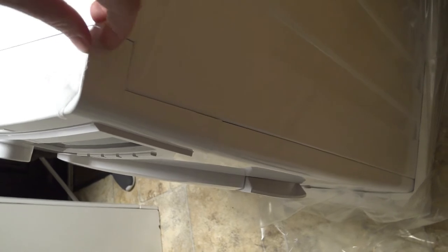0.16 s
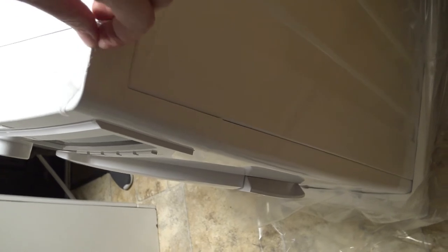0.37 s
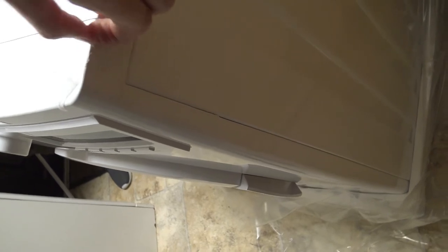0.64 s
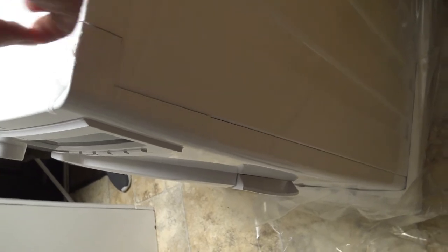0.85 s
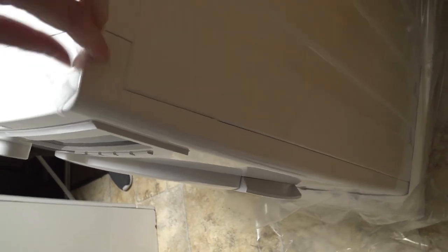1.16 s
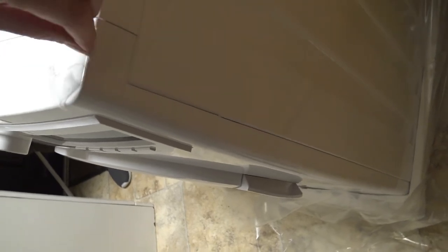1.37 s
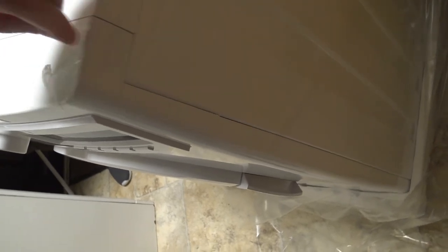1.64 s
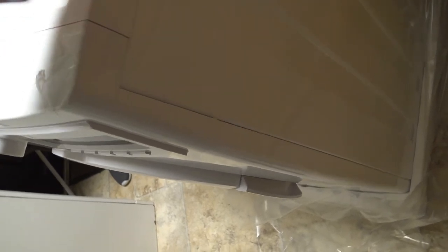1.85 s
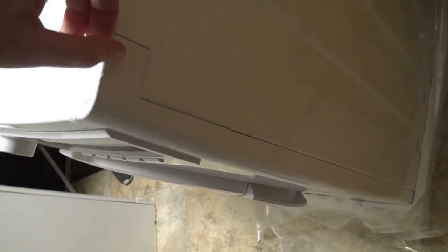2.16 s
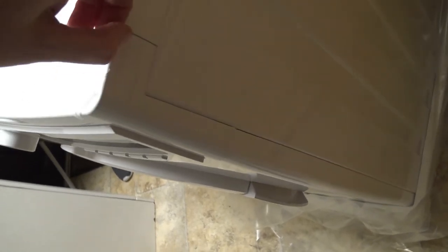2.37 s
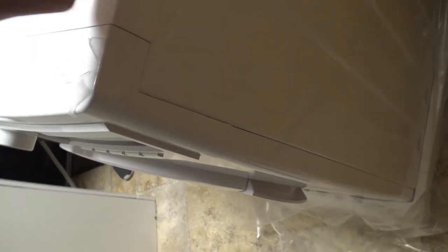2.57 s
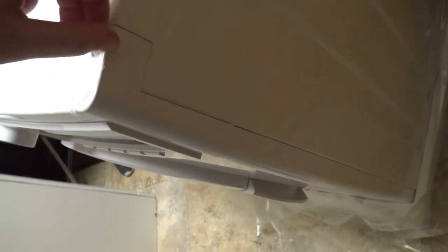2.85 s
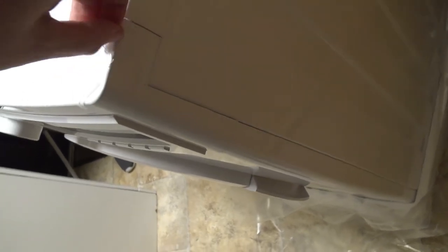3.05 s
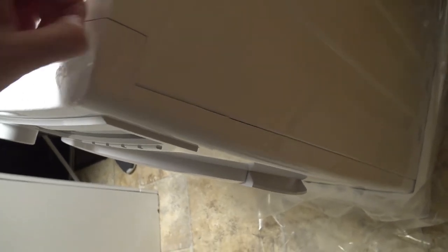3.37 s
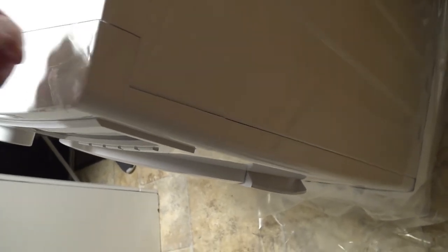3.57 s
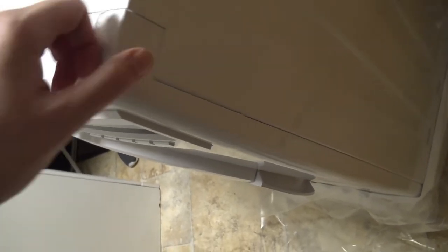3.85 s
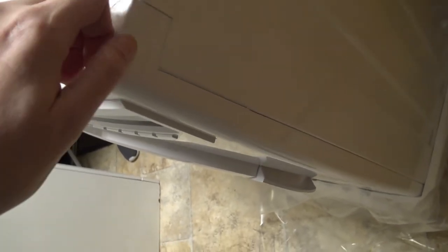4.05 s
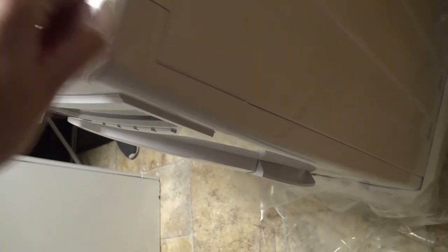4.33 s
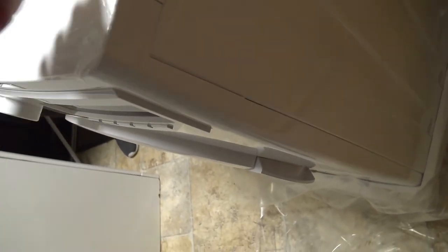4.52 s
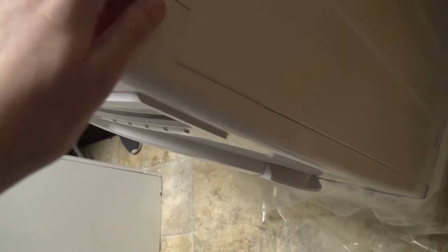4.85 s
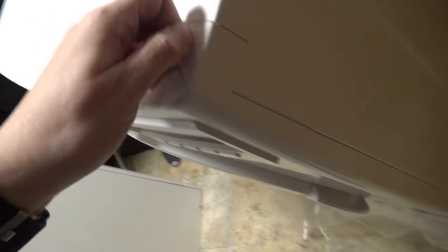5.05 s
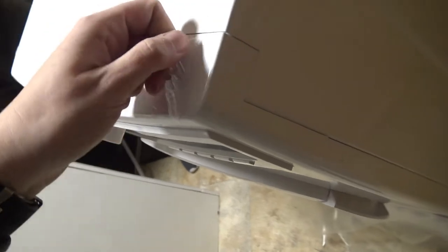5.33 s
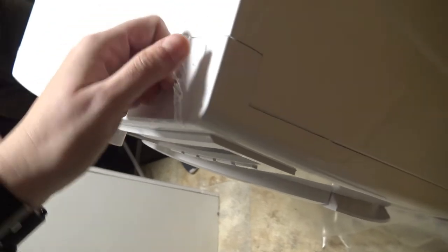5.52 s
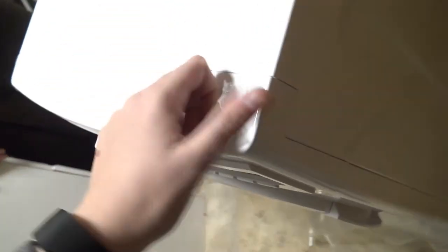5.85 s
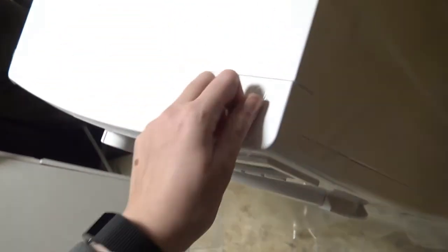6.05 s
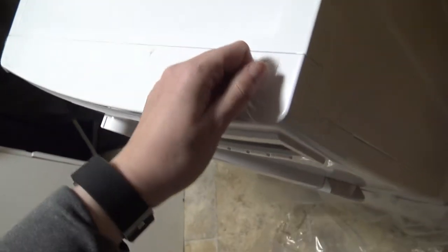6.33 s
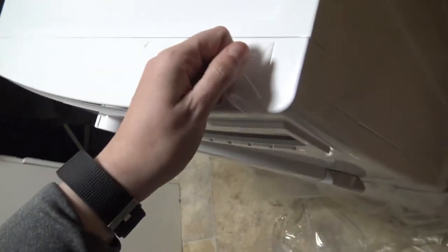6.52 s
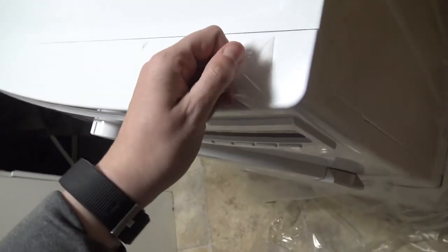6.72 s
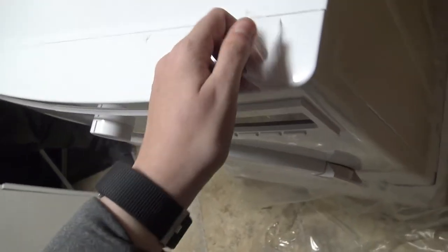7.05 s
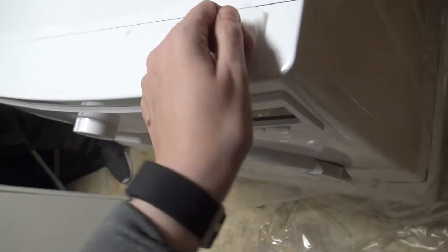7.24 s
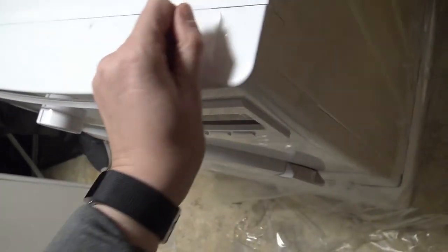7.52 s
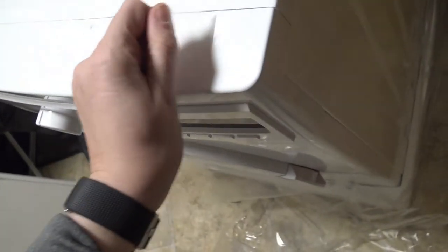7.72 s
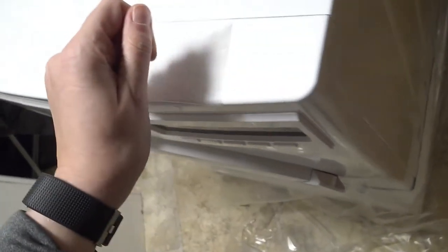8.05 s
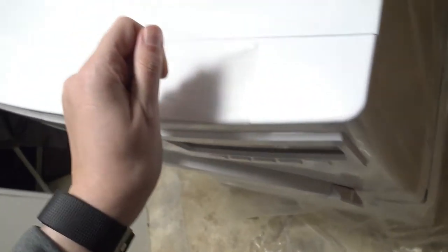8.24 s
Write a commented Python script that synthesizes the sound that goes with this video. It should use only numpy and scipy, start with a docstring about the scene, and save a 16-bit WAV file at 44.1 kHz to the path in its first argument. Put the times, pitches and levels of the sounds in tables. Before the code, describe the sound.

Fingers pick at plastic film on an enamelled appliance, close to the microphone in a small, hard room. After a few faint ticks, a short, bright crackle comes at about 0.8 seconds, and sharp snaps follow around 1.6 to 1.8. Quiet picking leads to a crackling pull from 3.3 to 3.6, then more light ticks. At 5 seconds a dense, loud peel falls in pitch and ends in two snaps near 5.4. Smaller crackles follow around 5.8 and 6.1, then loud, separate, slightly hollow snaps from 6.4 to 6.9. After a brief lull, the longest peel runs from about 7.6 to 8.4, crackling and getting deeper as the lifted flap grows. Now and then a finger softly bumps the panel. The snaps have a short room echo, and a distant fan and a faint floor rumble continue underneath.

```python
"""In a small hard room, fingers pick at the plastic film on an enamelled appliance and peel it in jerks.
The glue crackles and lets go in sharp snaps. These ring the air pocket under the lifted flap, deeper as
the flap grows. Now and then a finger bumps the panel. A fan hums far off and the floor rumbles faintly.
The microphone's limiter turns the sound down under the loudest snaps, so their echoes seem to swell."""
import sys
import numpy as np
from scipy import signal
from scipy.fft import rfft, irfft, next_fast_len
from scipy.io import wavfile

SR = 44100
rng = np.random.default_rng(int(sys.argv[2]) if len(sys.argv) > 2 else 0)


def inscribe(sig):
    """Save sig as 16-bit PCM at rate SR to the path in sys.argv[1].

    A 1-D sig is mono; a 2-D sig holds one channel per row.
    Samples are clipped to [-1, 1] before scaling.
    """
    pcm = np.round(np.clip(np.atleast_2d(sig).T, -1, 1) * 32767)
    wavfile.write(sys.argv[1], SR, pcm.astype(np.int16))


N = 369999
GRAIN = 1024   # samples in one short piece of sound

# Single snaps of glue letting go: start_s, peak_db, colour_hz (the middle of a broad bright band)
GLUE_SNAPS = [(0.157, -33, 4060), (0.1688, -37, 4580), (0.177, -28, 1910), (0.7427, -30, 8550),
              (0.826, -2, 8900), (0.85, 1, 8500), (0.8546, -4, 7760), (.8597, -13, 7500),
              (0.8652, -1, 7000), (0.8712, -8, 7000), (0.8815, 2.5, 10400), (0.8861, -3, 8800),
              (0.8914, -10, 9000), (0.8987, 2, 10300), (.9041, -9, 8800), (0.9141, -2, 6900),
              (0.9412, -12, 6300), (1.3852, -18, 10700), (1.4508, -31, 4700), (1.4625, -26, 4930),
              (1.482, -22, 10600), (1.522, -28, 11000), (1.551, -18.5, 10400), (1.624, -2, 10900),
              (1.696, -24, 6440), (1.72, -15.5, 10000), (1.7604, 2, 10200), (1.763, 8.5, 10400),
              (1.789, -2, 10200), (2.121, -12.5, 10200), (2.1482, -27, 9900), (2.172, -35, 4620),
              (2.483, -35.5, 8800), (2.791, -30.5, 10800), (3.011, -33, 5100), (3.032, -23, 4380),
              (3.093, -34, 3180), (3.172, -31, 8240), (3.23, -18.5, 6600), (3.2372, -13, 11400),
              (3.2878, -6, 11300), (3.3018, -20, 1200), (3.3123, -13, 2000), (3.3345, -8, 4800),
              (3.3366, 2, 10900), (3.3507, -3, 10600), (3.3687, 3, 9400), (3.404, 4, 9600),
              (3.4083, 0, 9000), (3.4177, -6, 8600), (3.4208, -21, 9500), (3.4251, -10, 10100),
              (3.4298, -2, 10800), (3.436, -10, 10700), (3.4436, -4, 11000), (3.4476, 5, 11700),
              (3.4513, -4, 11500), (3.4613, 4, 11100), (3.465, 6.5, 11000), (3.4697, -5, 11000),
              (3.4748, 1, 9900), (3.48, -3, 10300), (3.5736, -5.5, 8800), (3.6937, -32, 10100),
              (3.8893, -14.5, 8050), (4.0768, -36, 10900), (4.108, -22, 11000), (4.123, -25.5, 7530),
              (4.164, -26, 7600), (4.217, -30, 9320), (4.4023, -19, 5150), (4.591, -23.5, 12200),
              (4.8032, -27, 5000), (4.8785, -23, 10500), (4.918, -8.5, 10500), (4.997, -18, 10360),
              (5.01, -8.5, 10900), (5.0209, 2, 8500), (5.0372, 3, 9900), (5.042, 7, 10000),
              (5.0482, -2, 8000), (5.0532, 6, 9200), (5.0559, 6, 9500), (5.0623, 7, 9700),
              (5.0652, -3, 9000), (5.0734, 0, 7500), (5.0783, 6, 6200), (5.0872, -1, 6400),
              (5.0996, 2, 11000), (5.1037, 0, 9500), (5.1118, -1, 9000), (5.1264, 4, 6800),
              (5.1291, 5, 11700), (5.1322, 5, 10500), (5.1362, 5, 11300), (5.1427, 4, 8000),
              (5.1546, 1, 10000), (5.1619, 2, 9000), (5.1815, 3, 10000), (5.1874, -3, 10500),
              (5.204, 4, 8000), (5.2228, 3, 8600), (5.2373, 5, 9250), (5.252, 4, 8000), (5.2666, 3, 10000),
              (5.278, 3, 9500), (5.2904, 3, 8500), (5.3042, 4, 7800), (5.345, 4, 6400), (5.363, 9, 5900),
              (5.4267, 9, 5140), (5.6313, -24, 9550), (5.6996, -25.5, 6060), (5.734, -24, 5050),
              (5.7436, -13.5, 7150), (5.7475, -13, 6500), (5.7522, -10, 7500), (5.7556, -15, 7550),
              (5.7666, -13, 7000), (5.7687, -8, 6900), (5.772, -20, 7100), (5.7769, -12, 5500),
              (5.7827, -0.5, 6400), (5.786, -8, 7900), (5.7931, -5.5, 7300), (5.7999, -4.5, 6450),
              (6.012, -25.5, 6100), (6.0574, -15.5, 6700), (6.068, -8.5, 8950), (6.083, -6.5, 6100),
              (6.1447, -17, 11000), (6.1523, -20, 9500), (6.1604, -14, 8200), (6.165, -6, 7600),
              (6.1711, -14, 1100), (6.1781, -9, 7600), (6.2603, -19, 4700), (6.389, 8.5, 6200),
              (6.4436, 8, 5860), (6.4497, 13.5, 5800), (6.462, 11.5, 9700), (6.4727, 9, 8550),
              (6.4872, 5, 10300), (6.585, 10, 4900), (6.5986, 5.5, 5360), (6.6375, 14.5, 4640),
              (6.8921, 13.5, 5060), (7.099, -24, 8350), (7.213, -22, 10700), (7.226, -25, 9700),
              (7.2358, -25, 3420), (7.274, -25, 4470), (7.302, -19, 2400), (7.3968, -34, 9700),
              (7.4222, -14.5, 6460), (7.426, -4, 13600), (7.479, -25, 3180), (7.491, -11, 11900),
              (7.5364, -26.5, 7300), (7.5868, -7, 9200), (7.5903, -0.5, 6600), (7.6097, 3, 8900),
              (7.6649, 10, 11100), (7.675, 10.5, 7100), (7.7581, 10, 10100), (7.7652, 8, 9000),
              (7.7784, 2, 9500), (7.7901, 6, 9500), (7.8121, 6, 8500), (7.8187, 4, 9000), (7.8214, 2, 6000),
              (7.824, 3, 11000), (7.8305, -1, 9000), (7.8365, -1, 9000), (7.8422, 3, 9000),
              (7.8478, 1, 9500), (7.8523, 0, 9000), (7.8585, 0, 9000), (7.8649, 1, 8000), (7.8743, 0, 2900),
              (7.8791, 1, 10500), (7.8862, 1, 9500), (7.8904, -2, 3200), (7.8998, 2, 6000),
              (7.9096, 0, 3000), (7.9166, 1, 2800), (7.9244, 0, 5400), (7.9274, 2, 3200), (7.9309, 3, 5500),
              (7.9412, 0, 5500), (7.9544, 2, 3000), (7.9622, 2, 3200), (7.9667, 2, 3200), (7.9736, 2, 3100),
              (7.9786, 2, 2900), (7.9866, 2, 3000), (7.9928, 3, 3000), (7.9984, 2, 11000),
              (8.0052, 1, 11000), (8.0132, 2, 3200), (8.025, 0, 9000), (8.0303, 1, 6000), (8.0385, 2, 5500),
              (8.0434, 3, 2850), (8.0489, 1, 9000), (8.0679, 4, 2800), (8.0732, 3, 2600), (8.0833, 4, 6000),
              (8.1359, 7, 4100), (8.1476, 2, 4400), (8.1664, 6, 3500), (8.1725, 7, 3180),
              (8.1783, -1, 4000), (8.1855, -2, 3600), (8.1962, 5, 4260), (8.2022, -4, 3225),
              (8.2057, 4, 4240), (8.212, -3, 6000), (8.2247, 9.5, 3340), (8.2306, -1, 5500),
              (8.2398, 8, 5600), (8.3075, -5.5, 5650), (8.3745, 2, 3320)]
# Runs of sticking and slipping: start_s, length_s, gap_ms, peak_db, first_colour_hz, last_colour_hz
SLIP_RUNS = [(1.392, .05, 14, -30, 10500, 10000), (3.903, 0.066, 12.3, -25.5, 9900, 9300),
             (3.967, .11, 28, -42, 10500, 10500), (4.12, .12, 25, -31, 8000, 9050),
             (4.926, 0.058, 8.1, -19, 10800, 11100), (5.555, 0.026, 3.6, -27, 6400, 5650),
             (5.601, .1, 20, -34, 9500, 9500), (7.121, .085, 25, -41, 11500, 11500),
             (7.325, .07, 19, -40, 12000, 12500)]
# Stretches of crackle and hiss: start_s, length_s, first_level_db, last_level_db, first_pocket_hz,
# last_pocket_hz, pocket_db, below_pocket_db, above_pocket_db, first_flap_hz, last_flap_hz, flap_db The pocket
# and flap levels set the balance of the tone, not its loudness.
STRETCHES = [(0.146, 0.019, -59, -49, 2900, 1680, -21, -10, -30, 900, 790, 0),
             (0.519, 0.027, -54, -52, 1740, 1680, -16, 8, -30, 800, 794, 24),
             (0.738, 0.015, -46, -55, 3500, 3500, -10, 1, -7, 600, 600, -20),
             (0.821, 0.03, -28, -34, 8400, 7840, -2, -17, -31, 910, 800, -37),
             (0.856, 0.13, -23, -38.5, 5900, 5260, -10, -12, -13.5, 830, 510, -46),
             (1.378, 0.016, -32.5, -68, 3600, 3800, -9, -40, -13, 520, 500, -30),
             (1.443, 0.073, -46, -61, 4700, 4300, -18, -22, -30, 750, 750, -29),
             (1.523, 0.036, -51, -58, 2680, 2640, -10, -21, -33, 795, 796, -7),
             (1.62, 0.034, -32.5, -44.5, 5370, 5300, -46, -14.5, -14.5, 786, 790, -37),
             (1.681, 0.055, -44, -48.5, 5700, 5400, -26, -47, -43, 800, 800, -34),
             (1.756, 0.17, -24, -56, 4300, 4220, -21, -30.5, -27, 470, 470, -47),
             (2.08, 0.031, -43.5, -62, 3800, 3600, -23, 14, -31, 500, 500, -12),
             (2.116, 0.09, -47, -69, 4100, 3900, -34, -18, -9, 500, 496, -25),
             (2.484, 0.22, -60, -63.5, 2980, 2800, -10, -7, -30, 503, 500, 5),
             (2.8, 0.047, -48.5, -61, 3920, 3600, -9, 11, -28, 500, 500, -13),
             (2.86, 0.18, -62, -49, 3900, 3900, -10, -22, -26, 2300, 2350, -3),
             (3.002, 0.028, -48, -43.5, 4530, 4080, 1.5, -24, -31, 2440, 2400, 0),
             (3.063, 0.2, -53.5, -55.5, 4030, 3850, -6, -19, -32, 2500, 2340, -9),
             (3.225, 0.047, -39, -57, 4600, 4400, -34, -32, -17, 496, 500, -21),
             (3.298, 0.018, -60, -62, 3000, 3000, -7, -6, -30, 1300, 1250, -8),
             (3.338, .054, -48, -53, 3970, 4050, -2, -49, -30, 1010, 1000, -40),
             (3.403, 0.047, -23, -27.5, 6950, 4230, -9, -19, -11, 1200, 915, -36),
             (3.487, 0.039, -26.5, -28.5, 3900, 3600, -23.5, -26.5, -25.5, 910, 494, -32),
             (3.556, 0.24, -44, -69, 3860, 3620, -8, -18.5, -10, 500, 500, -42),
             (3.858, 0.12, -52, -53, 2980, 2960, -20, -16, -8.5, 506, 500, -38),
             (4.075, 0.29, -55, -58.5, 3530, 3600, -23, -8, -12, 500, 500, -28.5),
             (4.372, 0.016, -50, -42, 4200, 3600, 8, 6, 3, 500, 500, -15),
             (4.582, 0.0095, -37.5, -68, 7050, 7000, -37, -19, -15, 1200, 1220, -1),
             (4.806, .07, -50, -62, 3000, 3150, -21, 4, -26.5, 500, 494, 15),
             (4.879, 0.17, -46.5, -48, 7960, 9050, -38.5, -18.5, -19, 900, 1020, -43),
             (5.04, 0.08, -26, -21.5, 7240, 4550, 2, -19, -12, 1280, 860, -29),
             (5.161, 0.08, -36, -36, 3900, 2650, -5, -22, -8, 900, 700, -23),
             (5.244, 0.1, -37, -33, 2620, 1950, -1, -37, -11, 704, 520, -20),
             (5.349, 0.15, -37, -50, 1930, 1720, 6, -26, -1, 500, 500, -31),
             (5.549, 0.014, -41, -35, 6820, 5330, -15, -50, -40, 1040, 1086, -35),
             (5.747, 0.064, -26, -42, 6830, 3500, -12, -21, -5, 2410, 506, -7.5),
             (6.005, 0.042, -40, -54, 6200, 6000, -20, -20, -29, 990, 1010, -35),
             (6.077, 0.014, -23.5, -24.5, 6100, 5850, -7, -49, -26, 3200, 2100, -39),
             (6.104, .018, -22, -23, 2950, 3250, -3, -42, -13, 1750, 1200, -15),
             (6.124, .06, -29, -42, 6300, 4200, -14, -36, -15, 1150, 450, -12),
             (6.183, 0.19, -45.5, -30, 3900, 3600, -29, 19, -26, 740, 860, -17),
             (6.39, 0.044, -34, -42, 4190, 4200, -11, -2.5, -6, 1090, 1100, -41),
             (6.424, 0.14, -34, -33, 4630, 4300, 6, 2, -12.5, 1230, 1170, 1),
             (6.605, 0.087, -31, -39, 4000, 3850, 9, -14, 5, 1210, 920, 9.5),
             (6.736, 0.13, -33.5, -62, 3790, 3760, -6, 0, -3, 710, 686, -33),
             (6.879, 0.11, -35, -43, 4080, 4170, -4.5, -11, -10, 920, 806, -12),
             (7.014, 0.075, -40.5, -54, 10600, 10200, -12, -3, -38, 3500, 3280, -22),
             (7.273, 0.036, -72, -66, 2600, 2190, -25, -47, -11.5, 500, 500, -29),
             (7.383, 0.24, -47.5, -66, 2050, 1960, -1, -10.5, -7.5, 810, 810, -42),
             (7.513, 0.065, -52, -44.5, 4560, 4500, -2, 4, -23, 1230, 1210, 15),
             (7.573, 0.034, -45, -22, 5600, 5600, 1, -1.5, -32, 1310, 1230, -16),
             (7.661, 0.034, -13, -23.5, 6040, 5640, -1.5, 2, -28, 1250, 1200, -13),
             (7.751, 0.087, -35, -21.5, 6030, 5560, 13, 8.5, -33, 1310, 1115, 12.5),
             (7.807, 0.28, -31, -28, 4100, 1480, 5, -9, 1, 1120, 370, 5),
             (8.116, 0.13, -31, -24, 2920, 2340, 4.5, 9, -1, 1510, 1380, -1.5),
             (8.278, 0.064, -35, -38.5, 3440, 3060, 20, 18, -14, 1170, 1150, 7),
             (8.366, 0.021, -51, -20, 2465, 2400, 0, 1, -10, 1120, 1150, -5)]
# Fingers bumping the appliance: start_s, ring_db, push_db
FINGER_BUMPS = [(0.172, -57, -44), (0.538, -64, -45), (0.883, -46, -24), (1.544, -55, -51),
                (1.765, -49, -34), (4.552, -61, -42), (4.8, -59, -53), (5.049, -48.5, -41),
                (5.1813, -48, -22), (5.252, -53, -14.5), (5.425, -63, -15), (6.514, -46, -57),
                (7.7581, -39.5, -2.5), (8.134, -35.5, -48), (8.277, -44.5, -50)]
# The notes the panel rings at (wider ones die sooner): pitch_hz, width_hz, relative_db
PANEL_NOTES = [(264, 83, 7.5), (480, 5.3, -1.5), (790, 14, -2), (1244, 19, -8), (1374, 72, -12)]
# Time the room's own echo takes to fade by 60 dB: pitch_hz, fade_s
ECHO_TIMES = [(200, 0.75), (530, 0.23), (1400, 0.18), (3700, 0.15), (9700, 0.1), (16000, 0.023)]
# Strength of the side signal, which makes left and right differ: pitch_hz, gain_db
STEREO_WIDTH = [(30, -21), (110, -15), (380, -13), (700, -13.5), (1290, -18), (2380, -42.5), (4400, -20.5),
                (8120, -4), (15000, -19)]
# The tone of the fan's rushing air: pitch_hz, relative_db
FAN_AIR = [(15, -20), (25, -0.5), (159, 4), (321, 3), (378, 1.5), (568, -0.5), (634, 2), (1120, 0),
           (1220, -10), (1780, -6.5), (2330, -8.5), (3150, -12), (11900, -18), (15200, -84), (16500, -53)]
# The fan's hums: pitch_hz, width_hz, level_db
FAN_HUMS = [(1109, 35, -64), (161.9, 3.8, -72.5)]
# Rumble coming through the floor: time_s, level_db
FLOOR_RUMBLE = [(0.0, -55), (0.33, -56), (0.7, -54.5), (1.6, -64.5), (2.0, -63), (2.78, -58), (3.4, -71),
                (4.0, -70), (5.0, -75), (6.0, -67), (7.15, -66.5), (8.39, -88)]


def glue_snaps():
    """Each time the glue lets go, the film gives a click and a rattle about a millisecond long."""
    start_s, peak_db, colour_hz = np.transpose(GLUE_SNAPS + stick_and_slip())
    t = np.arange(GRAIN) / SR
    fade = np.exp(-t * np.maximum(colour_hz, 6000)[:, None] / 8)
    kicks = from_db(-16) * rng.standard_normal((len(start_s), GRAIN)) * fade
    kicks[:, 0] = np.sign(kicks[:, 0])   # the click ahead of the rattle
    snaps = irfft(rfft(kicks) * film_tone(start_s, colour_hz, colour_db=0), GRAIN)
    gain = from_db(peak_db) / np.abs(snaps).max(axis=1)
    return place(start_s, snaps * gain[:, None])


def stick_and_slip():
    """The glue holds and slips at uneven gaps, giving more rows like those of GLUE_SNAPS."""
    rows = []
    for start_s, length_s, gap_ms, peak_db, first_hz, last_hz in SLIP_RUNS:
        gap_luck, level_luck, colour_luck = rng.standard_normal((40, 3)).T
        after_s = (np.cumsum(gap_ms * np.exp(.28 * gap_luck)) - gap_ms / 2) / 1000
        colour_hz = (first_hz + (last_hz - first_hz) * after_s / length_s) * np.exp(.045 * colour_luck)
        run = np.transpose([start_s + after_s, peak_db + 2.5 * level_luck, colour_hz])
        rows += list(run[after_s < length_s])
    return rows


def crackle_and_hiss(ticks_per_s, spread_db):
    """Dense tiny ticks in the film's tone make the glue's crackle and hiss."""
    hop = GRAIN // 8
    start_s = np.arange(0, N, hop) / SR
    size_luck, sign_luck, tick_luck = rng.random((3, len(start_s), 2 * hop))
    sizes = from_db(-spread_db * np.log(np.maximum(size_luck, .01))) * np.sign(sign_luck - .5)
    ticks = sizes * (tick_luck < ticks_per_s / SR)
    ticks = ticks / np.sqrt(np.mean(ticks ** 2)) * np.sqrt(np.hanning(2 * hop))
    tone = unit_level(film_tone(start_s, np.full(len(start_s), 8000.), colour_db=-40))
    grains = irfft(rfft(ticks, GRAIN) * tone, GRAIN)
    return place(start_s, grains * stretch_level(start_s)[:, None])


def stretch_level(time_s, attack_s=.0014, fade_db_per_s=323, idle_db=-68.5):
    """Each stretch sets in quickly, slides from its first to its last level, and fades to a trace."""
    start_s, length_s, first_db, last_db = np.transpose(STRETCHES)[:4, :, None]
    age_s = time_s - start_s
    level_db = first_db + (last_db - first_db) * np.clip(age_s / length_s, 0, 1)
    level_db -= fade_db_per_s * np.maximum(age_s - length_s, 0)
    gains = from_db(level_db) * np.clip(age_s / attack_s, 0, 1)
    return np.sqrt(np.sum(gains ** 2, axis=0) + from_db(idle_db) ** 2)


def film_tone(time_s, colour_hz, colour_db, wobble=.04):
    """The air pocket rings, with a broad overtone about an octave up; flap and panel add their notes."""
    f = np.arange(GRAIN // 2 + 1) * SR / GRAIN
    pocket_hz, pocket_db, below_db, above_db, flap_hz, flap_db = np.array(lifted_flap(time_s))[..., None]
    pocket_hz = pocket_hz * np.exp(wobble * rng.standard_normal(pocket_hz.shape))
    panel = sum(from_db(db) * resonance(f, hz, width) for hz, width, db in PANEL_NOTES)
    below = from_db(below_db) * (1 + from_db(3) * panel) / (1 + 1j * f / (.89 * pocket_hz))
    below *= bass_cut(f, .5 * flap_hz) ** 3   # a small flap gives no bass
    above = from_db(above_db) * bass_cut(f, .39 * pocket_hz) ** 2
    pocket = from_db(pocket_db) * resonance(f, pocket_hz, .15 * pocket_hz)
    overtone = from_db(pocket_db - 9) * resonance(f, 1.9 * pocket_hz, .75 * pocket_hz)
    flap = from_db(flap_db) * resonance(f, flap_hz, .24 * flap_hz)
    colour = from_db(colour_db) * resonance(f, colour_hz[:, None], .84 * colour_hz[:, None]) ** 2
    treble = 1 / (1 - (f / 12500) ** 2 + 1j * f / 15000)   # a lift, then a fall at the very top
    return (below + above + pocket + overtone + flap + colour) * bass_cut(f, 120) ** 3 * treble


def lifted_flap(time_s, bass_db_per_octave=5.5):
    """In each stretch the pocket and flap change size at a steady speed: the bigger, the deeper."""
    rows = np.array(STRETCHES)
    latest = np.maximum(np.searchsorted(rows[:, 0], time_s + .003) - 1, 0)
    (start_s, length_s, _, _, first_pocket_hz, last_pocket_hz, pocket_db, below_db, above_db,
     first_flap_hz, last_flap_hz, flap_db) = rows[latest].T
    progress = np.clip((time_s - start_s) / length_s, 0, 1)
    pocket_size = 1 + (first_pocket_hz / last_pocket_hz - 1) * progress
    flap_size = 1 + (first_flap_hz / last_flap_hz - 1) * progress
    below_db = below_db + bass_db_per_octave * np.log2(pocket_size)
    return first_pocket_hz / pocket_size, pocket_db, below_db, above_db, first_flap_hz / flap_size, flap_db


def finger_bumps():
    """A soft touch rings the panel and gives the whole appliance a short, low push."""
    start_s, ring_db, push_db = np.transpose(FINGER_BUMPS)
    t = np.arange(GRAIN) / SR
    shares = from_db(rng.normal(0, 2.5, (len(start_s), len(PANEL_NOTES))))
    notes = np.array([from_db(db) * np.sin(2 * np.pi * hz * t) * np.exp(-np.pi * width * t)
                      for hz, width, db in PANEL_NOTES])
    rings = from_db(ring_db)[:, None] * (shares @ notes)
    pushes = from_db(push_db)[:, None] * np.sin(2 * np.pi * 150 * t) * np.exp(-t / .0013)
    return place(start_s, rings), place(start_s, pushes)


def room_echo(sound, far_db=-16, far_times_longer=3.4):
    """The walls echo and the space beyond rings on, fading band by band; gives middle and side."""
    t = np.arange(SR // 2) / SR
    edges_hz = 60 * 2 ** np.arange(0, 8.5, .5)
    tails = np.zeros((2, len(t)))
    for low, high in zip(edges_hz, np.minimum(edges_hz[1:], .45 * SR)):
        band = signal.butter(2, [low, high], "band", fs=SR, output="sos")
        noise = signal.sosfilt(band, rng.standard_normal(tails.shape))
        fall_db = -60 * t / at_hz(ECHO_TIMES, np.sqrt(low * high))
        tails += noise * (from_db(fall_db) + from_db(far_db + fall_db / far_times_longer))
    tails *= 1 - np.exp(-(t / .0035) ** 2)   # the walls answer after a few ms
    tails /= np.sqrt(np.sum(tails ** 2, axis=1, keepdims=True))
    return signal.fftconvolve(sound[None], tails, axes=1)[:, :N]


def fan_and_floor(air_db=-59):
    """A fan rushes and hums steadily while the floor's rumble drifts in level; gives middle and side."""
    air_noise, floor_noise, *hum_noises = rng.standard_normal((2 + len(FAN_HUMS), 2, N))
    air = from_db(air_db) * unit_level(filtered(air_noise, lambda f: from_db(at_hz(FAN_AIR, f))))
    hums = sum(from_db(db) * unit_level(filtered(noise, lambda f: resonance(f, hz, width)))
               for noise, (hz, width, db) in zip(hum_noises, FAN_HUMS))
    rumble = unit_level(filtered(floor_noise, lambda f: resonance(f, hz=30.2, width_hz=30) ** 2))
    rumble_db = np.interp(np.arange(N) / SR, *np.transpose(FLOOR_RUMBLE))
    return air + hums + from_db(rumble_db) * rumble


def from_db(db):
    """Turn decibels into a number to multiply by."""
    return 10 ** (np.asarray(db) / 20)


def unit_level(x):
    """Scale each row to an average power of 1."""
    return x / np.sqrt(np.mean(np.abs(x) ** 2, axis=-1, keepdims=True) + 1e-20)


def at_hz(table, hz):
    """Read a table between its pitches."""
    pitches_hz, values = np.transpose(table)
    return np.interp(np.log(np.maximum(hz, 1)), np.log(pitches_hz), values)


def resonance(f, hz, width_hz):
    """How something that rings at hz answers the frequencies f; 1 at its peak."""
    return 1j * f * width_hz / (hz ** 2 - f ** 2 + 1j * f * width_hz)


def bass_cut(f, hz):
    """A gain that gently weakens the frequencies below hz."""
    return 1j * f / (1j * f + hz)


def filtered(sound, gain_at):
    """Turn each frequency of a long sound up or down."""
    size = next_fast_len(N + SR)
    f = np.arange(size // 2 + 1) * SR / size
    return irfft(rfft(sound, size) * gain_at(f), size)[..., :N]


def place(start_s, grains):
    """Add each short piece of sound to the time line at its start."""
    samples = np.round(start_s * SR).astype(int)[:, None] + np.arange(GRAIN)
    return np.bincount(samples.ravel(), grains.ravel(), N + GRAIN + SR)[:N]


def scene():
    """Mix the close peeling and bumps with the echo and background, in left and right."""
    rings, pushes = finger_bumps()
    peeling = glue_snaps() + crackle_and_hiss(ticks_per_s=3000, spread_db=3)
    bumps = signal.sosfilt(signal.butter(2, 75, "high", fs=SR, output="sos"), rings + pushes)
    echo = from_db(-8) * room_echo(peeling + from_db(7) * rings)   # the low pushes get no echo
    middle, side = echo + fan_and_floor()
    side = filtered(side + pushes, lambda f: from_db(at_hz(STEREO_WIDTH, f)))
    return peeling + bumps + middle + side * np.array([[1], [-1]])


def record(dry):
    """A limiter turns down just before each loud peak and soon lets go; the highest treble is cut."""
    threshold_db, squeeze, release_db_per_s, attack_s, look_ahead_s = -5, .55, 550, .001, .0025
    samples = np.arange(N)
    over_db = np.maximum(20 * np.log10(np.abs(dry).max(axis=0) + 1e-9) - threshold_db, 0)
    release_db = release_db_per_s * samples / SR
    held_db = np.maximum.accumulate(over_db + release_db) - release_db   # each peak falls away steadily
    smoothing = np.exp(-1 / (attack_s * SR))
    smooth_db = signal.lfilter([1 - smoothing], [1, -smoothing], held_db)
    dip_db = squeeze * np.interp(samples + look_ahead_s * SR, samples, smooth_db)
    limited = .8 * np.tanh(dry * from_db(-dip_db) / .8)   # round off the peaks that get through
    dulled = signal.sosfilt(signal.cheby2(10, 25, 15900, fs=SR, output="sos"), limited)
    return signal.sosfilt(signal.cheby2(14, 85, 16900, fs=SR, output="sos"), dulled)


dry = scene()
out = record(dry)
inscribe(out)
```